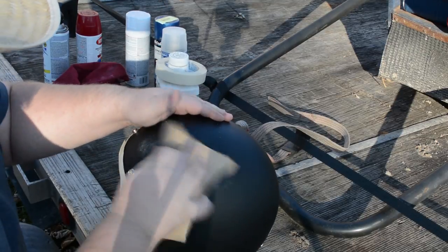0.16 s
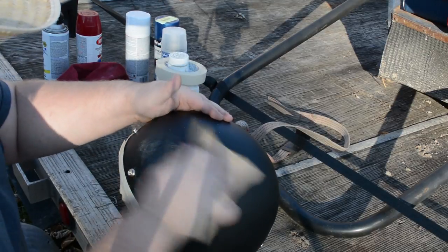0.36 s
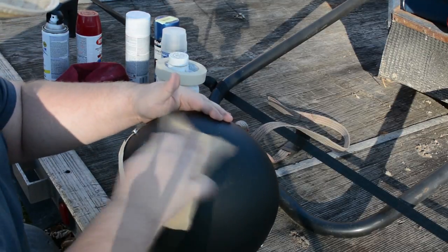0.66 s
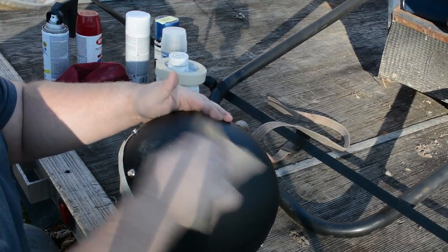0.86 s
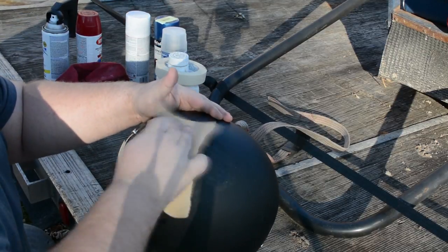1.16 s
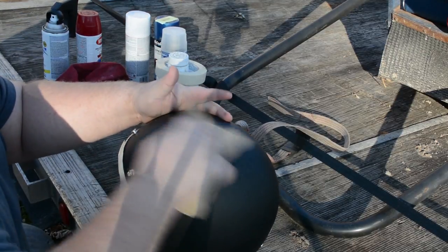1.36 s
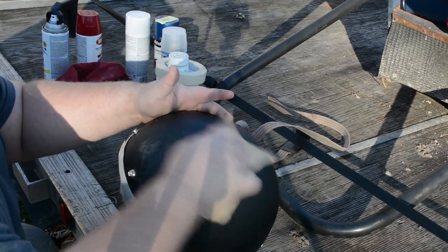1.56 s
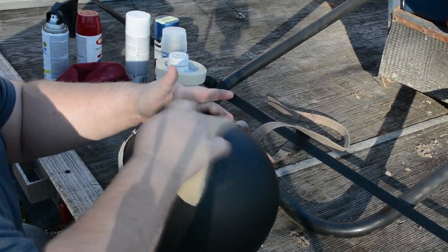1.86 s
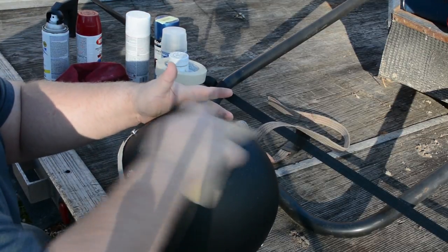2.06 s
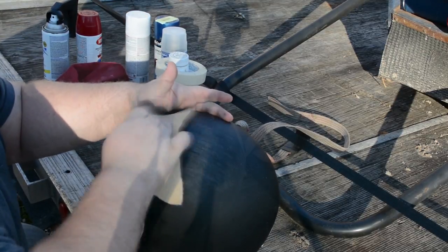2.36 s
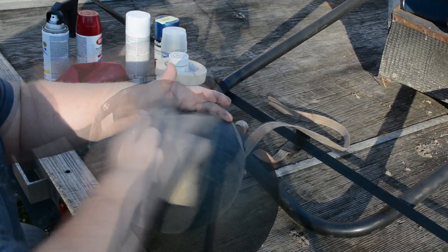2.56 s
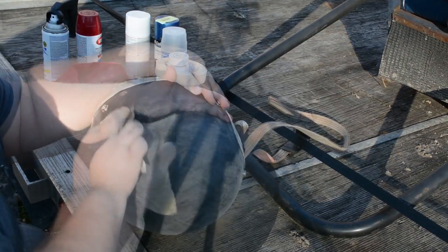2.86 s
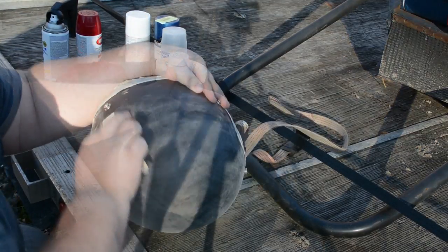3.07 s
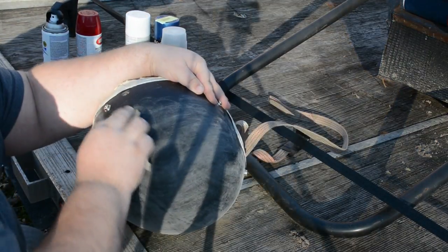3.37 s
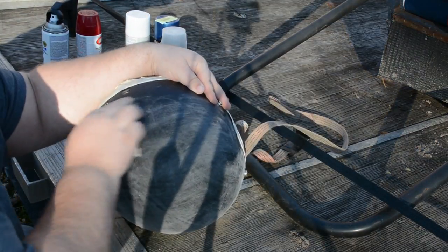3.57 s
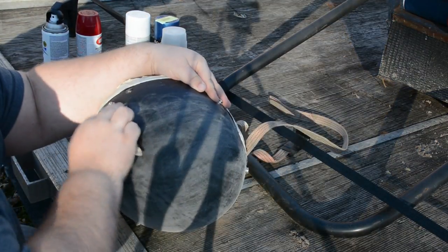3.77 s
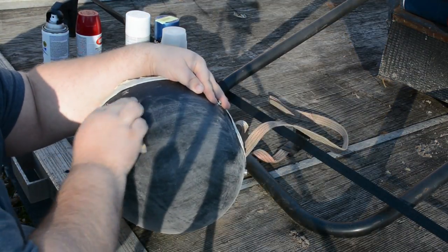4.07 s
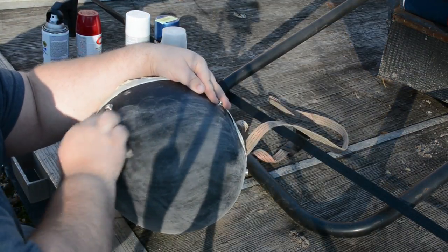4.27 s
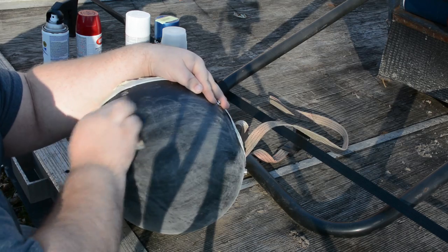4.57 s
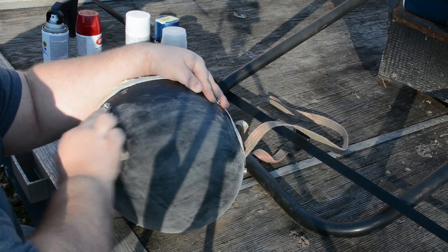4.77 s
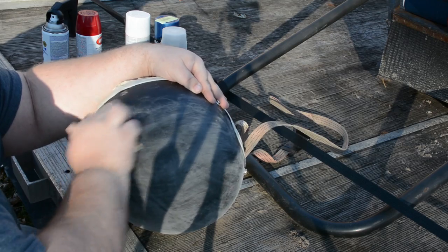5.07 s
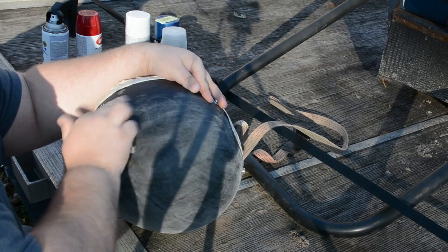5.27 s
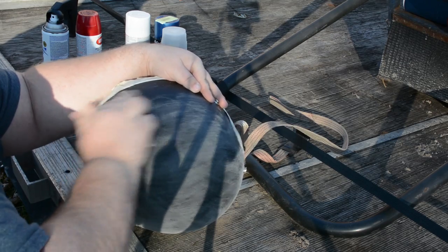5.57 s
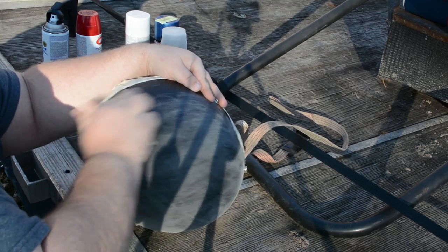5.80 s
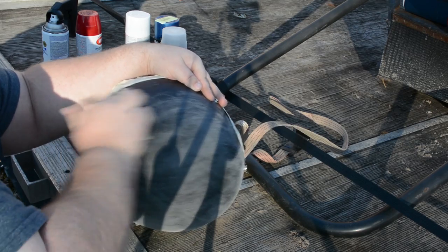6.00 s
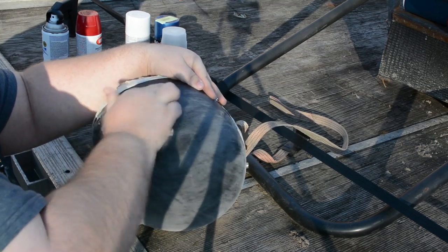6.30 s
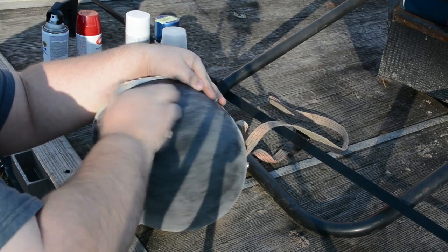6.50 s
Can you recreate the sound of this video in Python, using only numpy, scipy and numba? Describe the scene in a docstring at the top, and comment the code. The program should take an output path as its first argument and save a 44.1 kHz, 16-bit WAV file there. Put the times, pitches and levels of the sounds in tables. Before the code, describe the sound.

Coarse sandpaper is rubbed by hand over a painted helmet in fast, even back-and-forth strokes. The dense, scratchy hiss carries a slight hollow ring from the shell and sharp catches of grit. About halfway, the strokes fade to lighter rubbing, with small ticks and a few dull knocks as the helmet shifts. It is outdoors, an arm's length from the microphone, over a faint distant rumble.

```python
"""A dense, scratchy hiss, to and fro: coarse sandpaper rubbed by hand over a painted helmet shell,
outdoors, an arm's length from the microphone. Grit scratches the paint, catches and slips ring the
shell, loose grains crack and the shell knocks on its seat. Strokes on the crown fade over into
lighter strokes at the rim. Distant rumble lies underneath."""
import sys
import numpy as np
from scipy import signal
from scipy.fft import rfft, irfft
from scipy.io import wavfile
from scipy.ndimage import uniform_filter1d
from numba import njit

SR = 44100
rng = np.random.default_rng(int(sys.argv[2]) if len(sys.argv) > 2 else 0)


def generate_wav(signal):
    """Clip the signal to [-1, 1] and save it as 16-bit WAV at the path in sys.argv[1]."""
    frames = np.transpose(np.atleast_2d(signal))
    scaled = np.clip(frames, -1, 1) * 32767
    pcm = np.round(scaled).astype(np.int16)
    wavfile.write(sys.argv[1], SR, pcm)


N = 292824
TIME = np.arange(N) / SR


def undb(db):
    return 10 ** (np.asarray(db) / 20)


def unit(x):
    return x / np.sqrt(np.mean(x ** 2))


def colour(x, points):
    """Shape a sound by (Hz, dB) points."""
    hz, db = np.transpose(points)
    axis = np.log(np.maximum(np.arange(N // 2 + 1) * SR / N, 1))
    return irfft(rfft(x) * undb(np.interp(axis, np.log(hz), db)), N)


@njit
def svf(x, hz, width_hz):
    """State-variable band-pass with a moving centre, gain 1 there."""
    y, band, low = np.empty(len(x)), 0., 0.
    for i in range(len(x)):
        g, k = np.tan(np.pi * hz[i] / SR), width_hz / hz[i]
        v = (band + g * (x[i] - low)) / (1 + g * (g + k))
        band, low, y[i] = 2 * v - band, low + 2 * g * v, k * v
    return y


def resonate(x, hz, width_hz):
    """One resonance, steady or moving."""
    return svf(x, np.ones(len(x)) * hz, float(width_hz))


def walk(per_s):
    """Random levels, held and slewed twice; spread near 1."""
    k = int(SR / per_s)
    steps = np.repeat(rng.standard_normal(N // k + 1), k)
    return 1.66 * uniform_filter1d(uniform_filter1d(steps, k), k)[:N]


def grains(per_s, scatter_db):
    """Signed clicks at random moments, a few larger than the rest."""
    clicks = (rng.random(N) < per_s / SR) * rng.standard_normal(N)
    return unit(clicks * undb(scatter_db * np.minimum(rng.exponential(size=N), 3)))


def add(out, s, sound):
    i = int(s * SR)
    out[i:i + len(sound)] += sound[:N - i]


# Open air around the microphone: (frequency [Hz], gain [dB])
AIR_SPECTRUM = [(20, -20), (40, -13), (90, -5), (140, -8), (200, -4), (300, -7), (450, -5.5), (800, -2),
                (1100, -3), (1500, -22), (3000, -14), (8000, -37), (16000, -59)]
# Rumble from far off: (time [s], middle level [dB], bass level [dB])
RUMBLE_SWELLS = [(0.0, -49, -59.5), (0.83, -51, -57), (1.8, -48.5, -59.5), (2.09, -42, -54),
                 (2.18, -41, -53.5), (2.45, -51, -58.5), (3.12, -51.5, -61), (3.6, -53, -60.5),
                 (4.798, -54.5, -65), (5.8, -52.5, -60), (6.27, -51, -56.5), (6.64, -52, -60.5)]

def outdoors():
    """Far rumble swells slowly in two bands over a faint steady bed; returns mid and side."""
    s, middle_db, bass_db = np.transpose(RUMBLE_SWELLS)
    air = unit(colour(rng.standard_normal(N), AIR_SPECTRUM))
    middle = resonate(resonate(air, 800, 1300), 800, 760)
    bass = resonate(air, 200, 160)
    bed = undb(-51) * (air - middle - bass)
    gust_db = walk(8)
    rumble = unit(middle) * undb(np.interp(TIME, s, middle_db) + gust_db)
    rumble += unit(bass) * undb(np.interp(TIME, s, bass_db) + gust_db + 1.6 * walk(8.1))
    side = undb(-70.5) * unit(colour(rng.standard_normal(N), AIR_SPECTRUM))
    return rumble + bed, side


# Dull knocks under the helmet: (time [s], peak level [dB], pitch [Hz])
SEAT_KNOCKS = [(1.959, -32, 251), (1.999, -30, 748), (2.229, -39, 686), (2.553, -32, 750),
               (3.679, -32.5, 690), (5.534, -38.5, 278), (5.763, -28.5, 820), (5.985, -28.5, 729),
               (6.087, -32, 724), (6.306, -35, 643), (6.522, -32.5, 799), (6.609, -32, 654)]

def knocks():
    """The shell thumps on its seat: a noise burst through one broad resonance."""
    out, t = np.zeros(N), np.arange(3000) / SR
    for s, db, hz in SEAT_KNOCKS:
        thump = resonate(rng.standard_normal(len(t)) * np.exp(-t / .007), hz, .7 * hz)
        add(out, s, undb(db) * thump / np.abs(thump).max())
    return out


def rocking(slips):
    """Each push rocks the shell softly on its seat."""
    return unit(resonate(resonate(slips, 450, 800), 450, 960))


# Sharp ticks close to the microphone: (time [s], level [dB])
GRAIN_TICKS = [(0.98, -14.5), (2.7274, -14), (2.9994, -16.5), (3.0194, -32), (3.3994, -29), (3.429, -43),
               (3.467, -22.5), (3.5304, -34), (3.5746, -23), (3.587, -31), (3.6394, -24), (3.7579, -31),
               (3.794, -25), (3.8974, -24), (4.9586, -30), (5.071, -28), (5.3328, -28), (5.4044, -17),
               (5.485, -34), (5.697, -25), (6.1325, -26), (6.3644, -25)]

def loose_grains():
    """Loose grains crack under the paper without ringing the shell."""
    out, t = np.zeros(N), np.arange(1500) / SR
    for s, db in GRAIN_TICKS:
        add(out, s, undb(db - 1) * rng.standard_normal(len(t)) * np.exp(-t / .00087))
    return out


# The helmet's upper resonances: (frequency [Hz], width [Hz], gain [dB])
SHELL_RINGS = [(2064, 440, 0.5), (2360, 110, 1.5), (2800, 1040, 0), (3144, 150, 4), (3904, 220, 3),
               (4450, 660, 0.5)]

def upper_rings(free_hz, chatter_db):
    """Rubbing rings the shell most near free_hz, where the hand leaves it free."""
    out = np.zeros(N)
    for hz, width_hz, db in SHELL_RINGS:
        freedom = .35 + 1.1 * np.exp(-(np.log(hz / free_hz) / .25) ** 2)
        rub = grains(per_s=2200, scatter_db=3.5) * undb(db + 2 * walk(60) + .6 * chatter_db)
        out += freedom * resonate(rub, hz * (1 + .026 * walk(20)), width_hz)
    return unit(out)


def lowest_ring(slips, hz):
    """Slips drive the lowest resonance: narrow on the crown, higher and damped broad near the rim."""
    hz = hz * (1 + .037 * walk(25))
    narrow = unit(resonate(resonate(slips, hz, 300), hz, 380))
    broad = unit(resonate(slips, hz, 830))
    rim = np.clip((hz - 1400) / 200, 0, 1)
    return (1 - .79 * rim) * narrow + 1.35 * rim * broad


# Catches on the paint: (time [s], level [dB], crack gain [dB], ring pitch [Hz])
PAPER_SNAGS = [(0.0144, -21, -8, 1490), (0.2704, -14.5, -14, 1490), (0.5132, -14.5, -16, 1400),
               (0.7443, -17, -22, 1360), (0.7668, -11, -26, 1330), (1.1701, -16, 0, 1390),
               (1.2357, -13, -19, 1200), (1.4682, -16.5, -16, 1410), (1.706, -15, -11, 1440),
               (1.8467, -25, -8, 2240), (1.8662, -8, -15, 1400), (1.9006, -14, -26, 2000),
               (1.9579, -16, -21, 2150), (2.098, -13, -26, 1410), (2.364, -14, -11, 1370),
               (2.4478, -22, -8, 2200), (2.617, -17, 2, 1400), (2.6584, -21, -2, 2060),
               (2.7013, -18, -14, 2100), (3.02, -27, -5, 1300), (3.7589, -25, 0, 1420),
               (3.8516, -27, -15, 1680), (4.4483, -24, -8, 2230), (4.5688, -27, -8, 1540),
               (4.981, -28, -16, 1610), (5.2757, -24, -8, 1600), (5.7952, -27, -2, 1570),
               (5.9847, -21.5, 13, 1510), (6.3073, -25.5, -8, 1960), (6.5026, -30, -8, 2260),
               (6.5271, -29, -8, 2330)]

def snags():
    """The paper catches and lets go: a crack rings its own pitch and, briefly, all upper rings."""
    out, t = np.zeros(N), np.arange(1500) / SR
    for s, db, crack_db, hz in PAPER_SNAGS:
        noise = uniform_filter1d(rng.standard_normal(len(t)), size=7)
        crack = undb(crack_db) * noise * np.exp(-t / .0029)
        ring = np.sin(2 * np.pi * hz * t) * np.exp(-t / .0022)
        for upper_hz, width_hz, gain_db in SHELL_RINGS:
            size = .28 * rng.standard_normal() * undb(gain_db)
            ring += size * np.sin(2 * np.pi * upper_hz * t) * np.exp(-np.pi * width_hz * t)
        attack = np.minimum(t / .0012, 1)
        add(out, s, undb(db) * (ring + crack) * attack)
    return out


# Coarse paper on paint, at arm's length: (frequency [Hz], gain [dB])
GRIT_SPECTRUM = [(500, -36), (1000, -14.5), (1800, -4), (3000, -6.5), (4200, -2), (5300, -4), (8000, -2),
                 (12000, -1.5), (15500, -3)]

def grit():
    """Thousands of grains scratch the paint."""
    return unit(colour(grains(per_s=26000, scatter_db=1), GRIT_SPECTRUM))


def scratching(speed_db):
    """Grit sounds duller in slow sliding; the finest grains flicker on their own."""
    hiss = grit()
    dull = resonate(hiss, 3000, 7400)
    return dull + (hiss - dull) * undb(.15 * speed_db + walk(70))


# Stereo width of the hiss at the microphone: (frequency [Hz], side gain [dB])
SIDE_SPECTRUM = [(800, -50), (1500, -77), (2300, -15.5), (4400, -18.5), (8000, -15.5), (11000, -8),
                 (15500, -6)]

def hiss_side(hiss):
    """The finest hiss leans right and reaches the two sides partly unlike, a hair apart in time."""
    return colour(.83 * grit() - .15 * hiss + .4 * np.gradient(hiss), SIDE_SPECTRUM)


# One row a stroke: (time the grit bites [s], creep before it [ms], speeding up [ms], slowing [ms],
# level at fastest [dB], level at the turn before [dB], lowest ring level [dB], freest ring [Hz])
HAND_STROKES = [(0.013, 2, 42.4, 28.5, -24.0, -49, -40.5, 3080), (0.129, 15, 38, 51, -20.5, -37, -40, 2920),
                (0.267, 11, 23.6, 49, -19.5, -41.0, -40, 3900), (0.38, 16, 45, 43.3, -18, -45, -34.5, 2780),
                (0.51, 5, 41.6, 31, -19.5, -41, -37.5, 4320), (0.63, 6, 70, 17, -19.5, -36.5, -35.5, 2920),
                (0.764, 10, 33.3, 27, -19.5, -40.5, -36.5, 4600),
                (0.873, 7, 62, 30, -21.5, -39, -36.5, 2900), (1.006, -4, 28.6, 42, -21.5, -42, -36, 4700),
                (1.12, 20, 57.6, 23, -23, -48, -39, 3230), (1.246, 8, 35, 30, -22.5, -42, -37, 3760),
                (1.361, 9, 53, 27, -25.0, -43, -40, 3020), (1.486, 6, 27, 31.6, -22.5, -44, -41.5, 2020),
                (1.601, 5, 52.5, 24, -24.5, -43.5, -37, 2240),
                (1.719, 9, 26.5, 37, -24, -48.0, -35.5, 2060),
                (1.824, 6, 31, 52, -25.5, -44.5, -37.5, 2210), (1.951, 7, 22, 44, -23.5, -46, -37, 2060),
                (2.062, 13, 33, 75, -25.5, -43.5, -37, 2280), (2.212, 24, 37.6, 22, -23, -44.0, -36, 2030),
                (2.313, 0, 20, 63, -25.0, -40.5, -37.5, 2300),
                (2.446, 12, 16.6, 50, -25.5, -45, -39.5, 2000), (2.559, 4, 8.2, 80, -27.5, -45, -42, 2320),
                (2.691, 17, 15, 61, -28.0, -42, -37, 2340), (2.812, 10, 19, 67, -30.5, -45, -41.5, 2150),
                (2.945, 0, 35, 25, -31, -42, -43.5, 3610), (3.046, -3, 48, 55, -34, -43, -45.5, 2140),
                (3.202, 7, 58, 49, -38.0, -46, -47, 4470), (3.355, 0, 47, 90, -39, -57, -54, 4870),
                (3.495, 2, 87, 39, -35.5, -43, -55, 2410), (3.585, 0, 49, 60, -36, -42, -48.5, 2410),
                (3.747, 2.5, 11, 40, -38.5, -59, -45, 3100), (3.85, 12, 54, 21, -31, -59, -46, 2380),
                (3.981, 16, 26.4, 69.5, -28.5, -61, -47.5, 2520),
                (4.124, 10, 34, 57.5, -33, -56, -51.5, 2920), (4.283, 12, 40.5, 53, -33, -62.0, -48, 3700),
                (4.437, 10, 14.5, 44, -33.5, -57, -47.5, 2230), (4.569, 2, 11, 47.5, -31.5, -56, -52, 2410),
                (4.67, 0, 47, 59, -32.5, -61, -47.5, 4130), (4.831, 27, 12, 74, -33, -60, -46.5, 4130),
                (4.976, 4, 20.5, 35, -30.5, -59, -45.5, 4470), (5.088, 9, 23, 73, -30.5, -53, -47.5, 3960),
                (5.239, 0, 39, 33.5, -28, -54, -46, 3850), (5.357, 17, 37, 33, -28.5, -51.0, -48.5, 4130),
                (5.468, 14, 25.4, 46.6, -28, -50.0, -49, 4650), (5.595, 28, 11, 50, -29, -61, -48.5, 4200),
                (5.705, 0, 48.4, 17, -29, -52.0, -47.5, 4280), (5.827, 36, 7, 46, -29.5, -49, -44.5, 4130),
                (5.93, 3, 29.5, 33.4, -30, -55.0, -44, 4650), (6.046, 28, 14, 34, -28.5, -54.0, -48, 4130),
                (6.149, 12, 27, 38, -33.5, -54.0, -49, 4650), (6.263, 11, 14, 41, -30, -53, -50.5, 4100),
                (6.368, 2, 26, 45, -35.0, -59.0, -49.5, 4470), (6.494, 19, 15.4, 33.6, -32, -55, -51, 2200),
                (6.599, -1, 12, 29, -44, -57, -56, 2060)]

def hand():
    """Each stroke creeps, bites, speeds up and brakes; the sliding level arches with it."""
    bites, creep_ms, up_ms, down_ms, top_db, turn_db, ring_db, free_hz = np.transpose(HAND_STROKES)
    shoulder_db, creep_db = 7.5, 13  # under the top: at the ends of the arch, in the creep
    start_db_per_s, stop_db_per_s = 1200, 1000
    peaks = bites + up_ms / 1000
    brakes = peaks + down_ms / 1000
    creeps = bites - np.maximum(creep_ms, 0) / 1000
    turns = np.append(0, (brakes[:-1] + creeps[1:]) / 2)
    slide_db = np.interp(TIME, turns, turn_db)
    for creep, bite, peak, brake, db in zip(creeps, bites, peaks, brakes, top_db):
        span = slice(max(int((bite - .1) * SR), 0), int((brake + .1) * SR))
        t = TIME[span]
        off_peak = np.where(t < peak, (peak - t) / (peak - bite), (t - peak) / (brake - peak))
        drop = shoulder_db * np.clip(off_peak, 0, 1) ** 2
        drop += start_db_per_s * np.maximum(bite - t, 0) + stop_db_per_s * np.maximum(t - brake, 0)
        creep_drop = creep_db + start_db_per_s * np.maximum(creep - t, 0)
        drop = np.where(t < bite, np.minimum(drop, creep_drop), drop)
        slide_db[span] = np.maximum(slide_db[span], db - drop)
    slide_db = uniform_filter1d(slide_db, size=120)
    stroke = np.searchsorted(turns[1:], TIME)
    held = lambda column: uniform_filter1d(column[stroke], size=800)
    speed_db = slide_db - held(top_db)  # near 0 at the fastest, negative when slower
    return slide_db, speed_db, held(ring_db), held(free_hz)


# The paper's path, crown then rim: (time [s], lowest ring [Hz], upper ring gain [dB])
CROWN_TO_RIM = [(0.0, 1415, -2), (0.8, 1330, -3), (1.5, 1285, -1), (1.7, 1270, 1), (3.15, 1423, 1),
                (3.452, 1540, -4), (4.7, 1630, -3.5), (5.3, 1510, -7), (5.5, 1580, -10), (6.3, 1560, -9),
                (6.64, 1490, -0.5)]

def sanding():
    """Hiss follows hand speed; slips, strong even at low speed, ring and rock the shell."""
    slide_db, speed_db, ring_db, free_hz = hand()
    s, *columns = np.transpose(CROWN_TO_RIM)
    ring_hz, upper_db = (np.interp(TIME, s, column) for column in columns)
    pressure = undb(slide_db + 1.5 + walk(300) + .8 * walk(110))
    hiss = scratching(speed_db)
    chatter_db = 3 * walk(100)  # bursts of slipping shake all rings together
    slips = grains(per_s=2500, scatter_db=2) * undb(chatter_db)
    lowest = lowest_ring(slips, ring_hz) * undb(ring_db + 5 + .46 * speed_db)
    upper = upper_rings(free_hz, chatter_db) * undb(slide_db + upper_db - 4.5 - .2 * speed_db)
    push = rocking(slips) * undb(ring_db - 18 + .24 * speed_db)
    return pressure * hiss + lowest + upper, pressure * hiss_side(hiss), push


def scene():
    """The helmet close in front, open air behind; mid and side become left and right."""
    paper, paper_side, push = sanding()
    air, air_side = outdoors()
    # the shell sends little into the air below its lowest ring
    radiation = signal.butter(4, 1080, "high", fs=SR, output="sos")
    shell = signal.sosfilt(radiation, paper + snags() + loose_grains())
    mid = shell + push + knocks() + air
    side = paper_side + air_side
    lean_right_db = .25
    return np.array([(mid + side) * undb(-lean_right_db / 2), (mid - side) * undb(lean_right_db / 2)])


def record(dry):
    """The microphone drops the deepest bass; the recorder cuts the top steeply."""
    low_cut = signal.butter(2, 65, "high", fs=SR, output="sos")
    top_cut = signal.ellip(12, .2, 80, 15900, fs=SR, output="sos")
    return signal.sosfilt(top_cut, signal.sosfilt(low_cut, dry))


dry = scene()
out = record(dry)
generate_wav(out)
```